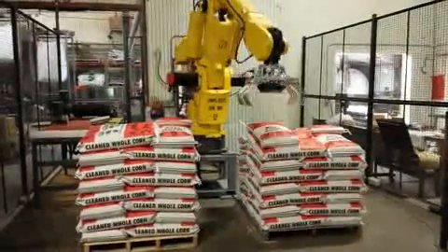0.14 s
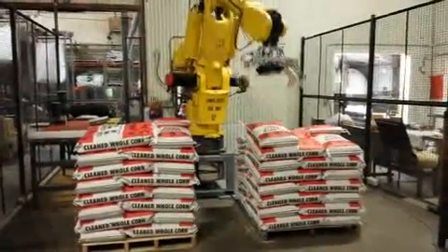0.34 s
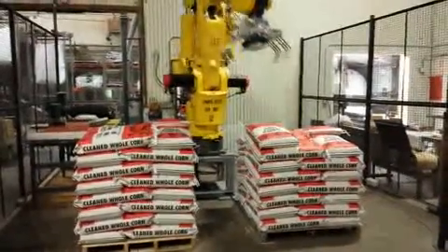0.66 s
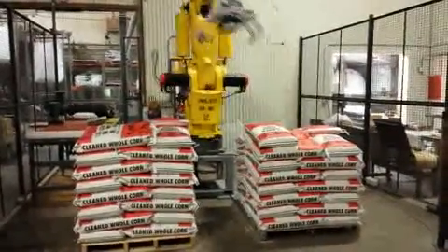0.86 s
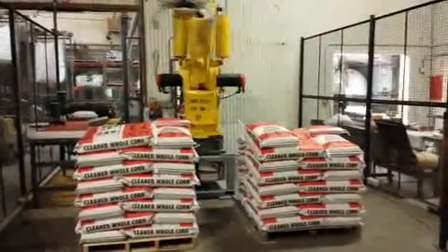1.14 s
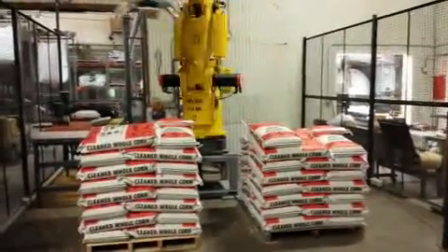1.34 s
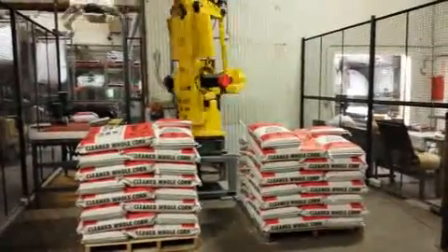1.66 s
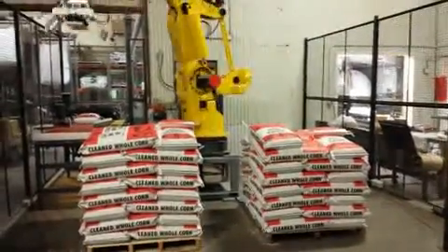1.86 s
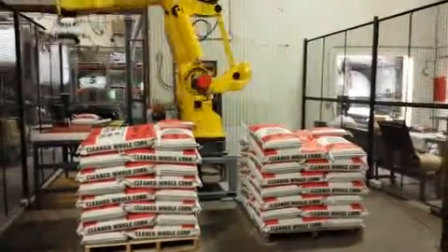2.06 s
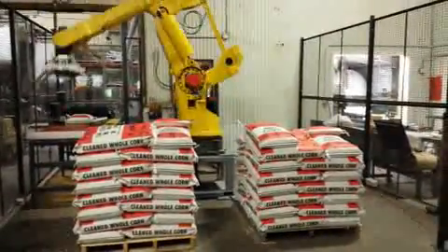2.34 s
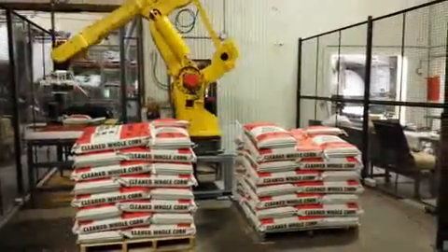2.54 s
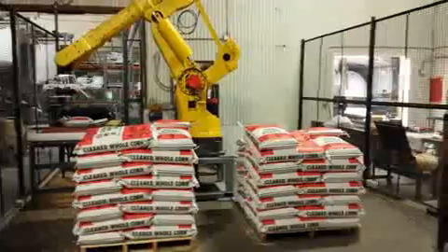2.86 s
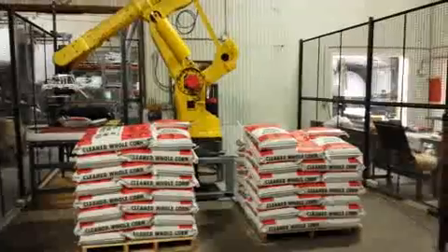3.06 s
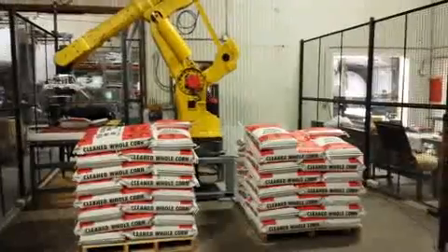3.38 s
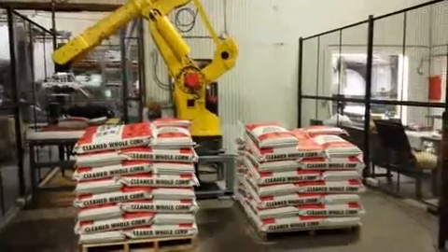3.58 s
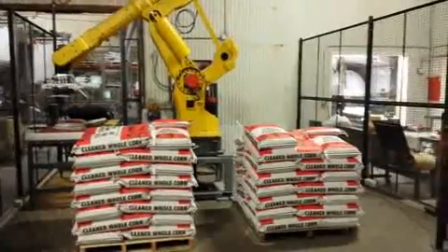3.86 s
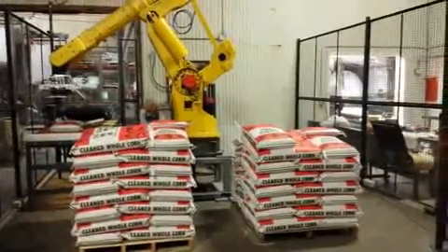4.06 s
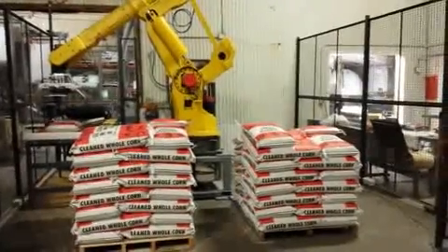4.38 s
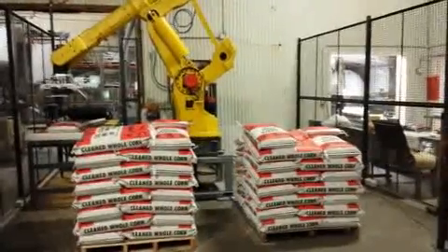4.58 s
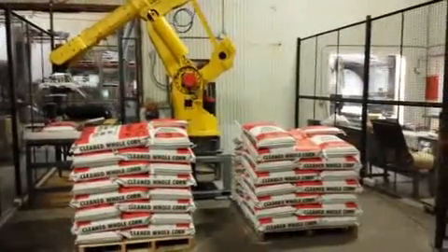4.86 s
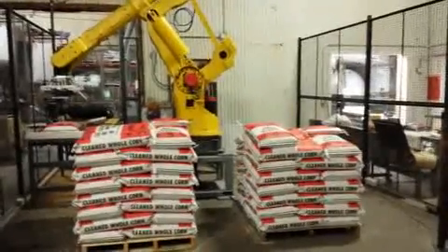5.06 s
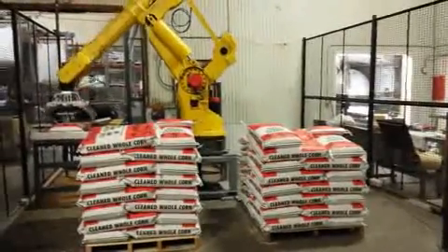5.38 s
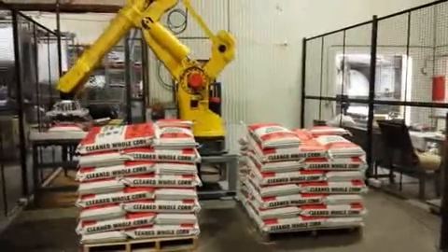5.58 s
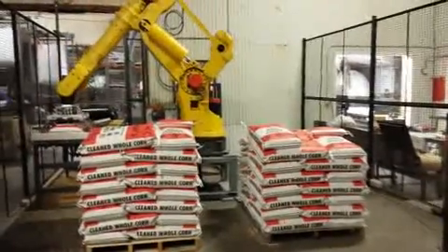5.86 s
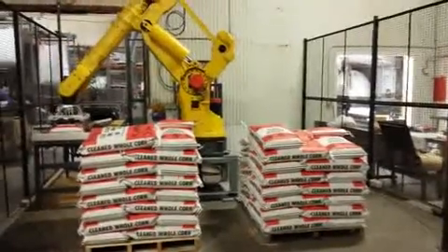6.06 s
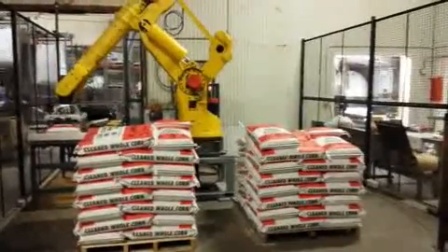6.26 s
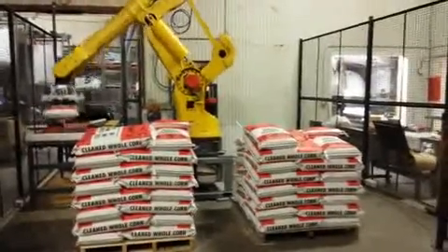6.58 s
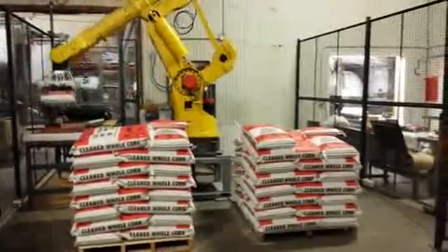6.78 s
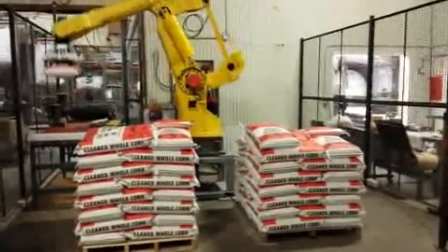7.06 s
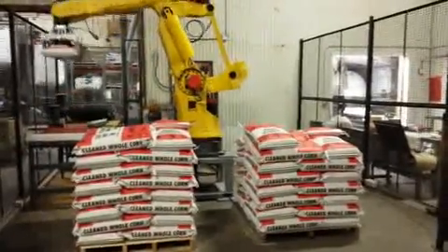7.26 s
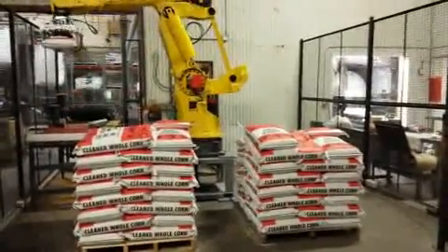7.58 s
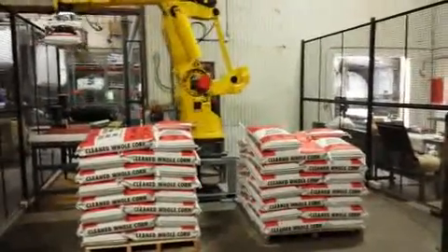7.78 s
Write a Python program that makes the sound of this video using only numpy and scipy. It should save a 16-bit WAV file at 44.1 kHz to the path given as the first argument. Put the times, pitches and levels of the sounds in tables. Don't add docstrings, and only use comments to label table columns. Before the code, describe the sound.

Heavy sacks thud down with air bursts, then a machine arm whines upward, metal clanks and sharp pneumatic hisses over whistling, humming factory noise.

```python
import sys
import numpy as np
from scipy import signal
from scipy.fft import rfft, irfft, next_fast_len
from scipy.io import wavfile
from scipy.ndimage import uniform_filter1d

SR = 44100
rng = np.random.default_rng(int(sys.argv[2]) if len(sys.argv) > 2 else 0)


def ratio(d):
    e = np.asarray(d, float) / 20
    return 10 ** e


def transcribe(signal):
    frames = np.atleast_2d(signal).T
    limited = np.clip(frames, -1, 1)
    pcm = np.round(limited * 32767).astype(np.int16)
    wavfile.write(sys.argv[1], SR, pcm)


N = 349266

# [pitch_hz, level_db per Hz]
BLOW_COLOUR = [(120, -44), (200, -4.5), (486, -5), (658, -10.5), (1030, -6), (2200, -3), (4910, -8),
               (5360, -3), (9140, -10), (14000, -30.5)]
# [start_s, level_db, ring_hz, fade_60db_s]
SACK_BLOWS = [
    (.016, -9.5, 2120, 0.077),
    (0.038, -16, 2050, .056),
    (.049, -25, 2100, .04),
    (.107, -28, 2140, .05),
    (.149, -10.5, 1880, 0.17),
    (.173, -9, 2080, .18),
]
# [start_s, level_db, ring_hz, fade_60db_s]
LATCH_BLOWS = [
    (4.934, -20, 1110, 0.27),
    (4.938, -27, 2000, .15),
    (4.957, -22, 1090, .2),
    (4.962, -19.5, 2040, .5),
    (5.002, -23, 1170, .12),
    (5.07, -29, 1100, 0.092),
]
# [start_s, level_db, ring_hz, fade_60db_s]
GRIPPER_BLOWS = [(4.17, -14, 1510, 0.83), (4.195, -14, 2090, .38), (4.23, -14, 2336, .16),
                 (5.002, -18, 1150, 0.21), (5.109, -14, 2010, 0.17), (5.7, -14.5, 1420, .15),
                 (6.06, -14, 2156, 0.22), (6.085, -15.5, 2170, 0.25), (6.11, -26, 1310, .15),
                 (6.811, -15.5, 2430, .25), (6.941, -14.5, 1464, 0.62), (7.82, -11.5, 1498, 0.36),
                 (7.86, -13.5, 2020, .25)]
# [left_minus_right_db, ring_share, rise_s]
STRUCK_THINGS = [
    (3, 0.43, 0.0017),
    (2.5, 2.2, .0011),
    (5.5, 0.32, .0012),
]


def clanks():
    mix = np.zeros((2, N))
    noise = diffuse(BLOW_COLOUR, patchy_db=1.0, flicker_db=.4)
    t = np.arange(SR // 3) / SR
    for blows, (lean_db, ring_share, rise_s) in zip((SACK_BLOWS, LATCH_BLOWS, GRIPPER_BLOWS), STRUCK_THINGS):
        for start_s, level_db, ring_hz, fade_s in blows:
            first = rng.integers(N - len(t))
            burst = noise[:, first:first + len(t)]
            ring = evened(resonate(burst, ring_hz, 94))
            attack = 1 - np.exp(-t / rise_s)
            shed_answer = ratio(-8.5 - 60 * t / 0.53)
            shape = attack * (ratio(-60 * t / fade_s) + shed_answer)
            level = ratio(level_db - 11.5) * sides(lean_db - 4.0)
            add(mix, start_s - .002, level * shape * (burst + ring_share * ring))
    return mix


# [time_s, pitch_hz, level_db]
SERVO_SWING = [
    (.7, 601, -68),
    (.97, 785, -50),
    (1.12, 850, -38),
    (1.3, 952, -32),
    (1.4, 980, -30.5),
    (1.47, 990, -25.5),
    (1.72, 997, -25),
    (1.84, 995, -29),
    (1.9, 997, -38),
]


def servo():
    t = np.arange(N) / SR
    start_s, end_s = SERVO_SWING[0][0], SERVO_SWING[-1][0]
    moving = np.interp(t, [start_s - .1, start_s, end_s, end_s + 0.17], [0, 1, 1, 0])
    pitch_hz = curve(SERVO_SWING, order=1)
    waver = evened(uniform_filter1d(rng.standard_normal(N), size=450))
    whine = np.sin(2 * np.pi * np.cumsum(pitch_hz * (1 + .011 * waver)) / SR)
    mesh = 1.2 * whine + .8 * ports(N, pitch_hz, 40)
    return ratio(curve(SERVO_SWING, order=2)) * moving * sides(-1.7) * mesh


# [start_s, level_db, open_s, fall_db_per_s]
VALVE_BLASTS = [(-.01, -27, 0.046, 125), (.01, -26.5, 0.0036, 450), (.1, -32, .002, 450),
                (.165, -32.5, .008, 600), (2.33, -33.5, 0.093, 100), (3.24, -34.5, .08, 100),
                (4.16, -36, .08, 80), (4.928, -25, 0.059, 167), (5.09, -34.5, 0.14, 200),
                (5.898, -19.5, 0.18, 168), (6.804, -27.5, .004, 150), (6.87, -33, 0.048, 97),
                (7.81, -46, 0.027, 40)]


def exhaust(t, bleed_db_per_s):
    opening_s, echo_db, echo_fall_db_per_s = 0.011, -16, 59
    power = 0
    for start_s, level_db, open_s, fall_db_per_s in VALVE_BLASTS:
        since = np.maximum(t - start_s, 0)
        shut = np.maximum(since - opening_s - open_s, 0)
        direct = ratio(-bleed_db_per_s * since - fall_db_per_s * shut)
        echo = ratio(echo_db - echo_fall_db_per_s * shut)
        opening = np.minimum(since / opening_s, 1)
        power = power + (ratio(level_db) * opening * (direct + echo)) ** 2
    return np.sqrt(power)


# [pitch_hz, level_db per Hz]
JET_COLOUR = [(900, -37), (1500, -15.5), (2160, -7.5), (3020, -10), (3870, -4.5), (6240, 1.5), (8000, -1),
              (9890, -4), (13000, -10.5), (14500, -21), (15200, -45)]


def valves():
    jet = diffuse(JET_COLOUR, patchy_db=1.2, flicker_db=.6)
    body = signal.filtfilt(*signal.butter(2, 7000, fs=SR), jet)
    treble = jet - body
    body_level = slowly(lambda t: exhaust(t, bleed_db_per_s=14))
    treble_level = ratio(2.5) * slowly(lambda t: exhaust(t, bleed_db_per_s=62))
    return ratio(4.0) * sides(-.8) * (body_level * body + treble_level * treble)


# [start_s, level_db, low_ring_hz, high_ring_hz]
RELAY_TICKS = [
    (2.2578, -9.5, 5900, 7900),
    (4.353, -26, 10700, 11000),
    (4.563, -21, 9500, 10500),
]


def ticks():
    mix, t = np.zeros((2, N)), np.arange(400) / SR
    for start_s, level_db, low_hz, high_hz in RELAY_TICKS:
        rings_hz = (low_hz, (low_hz + high_hz) / 2, high_hz)
        snap = sum(np.sin(2 * np.pi * hz * t) for hz in rings_hz)
        add(mix, start_s, ratio(level_db - 2 - 60 * t / .007) * snap * sides(.3))
    return mix


# [peak_s, level_db]
PRESSURE_SURGES = [(.04, 8), (.3, 8.5), (1.32, 5.5), (1.54, -4), (1.89, 1), (2.14, 3.5), (2.34, 2.5),
                   (2.65, 1.5), (2.82, 5.5), (3.15, -6), (3.37, 7), (3.6, 2.5), (3.88, 1), (4.08, 3),
                   (4.42, 6.5), (4.651, 1.5), (4.82, 4), (5.09, 2.5), (5.32, 1), (5.71, 4), (6.12, -5),
                   (6.34, 1), (6.55, -11), (6.83, 7.5), (7.0, 6.5), (7.14, 6), (7.36, 2), (7.6, 5),
                   (7.88, -7)]
# [deepest_s, change_db]
PRESSURE_DIPS = [(.19, -2), (1.18, 0.5), (2.245, -9), (2.6, -1.5), (3.25, -5), (3.99, -3), (5.25, -3),
                 (5.8, -2.5), (5.96, -7), (6.3, -4.5), (7.31, -3)]


def line_pressure(t):
    leak_db, kick_db_per_s, sink_db_per_s, dip_s = 2, 108, 64.5, 0.047
    power = ratio(leak_db) ** 2
    for peak_s, level_db in PRESSURE_SURGES:
        below_peak_db = np.maximum(kick_db_per_s * (peak_s - t), sink_db_per_s * (t - peak_s))
        power = power + ratio(level_db - below_peak_db) ** 2
    dips_db = sum(db * np.exp(-((t - s) / dip_s) ** 2) for s, db in PRESSURE_DIPS)
    return ratio(dips_db) * np.sqrt(power)


# [pitch_hz, width_hz, level_db, left_minus_right_db]
PIPE_NOTES = [(4745, 70, 0, 0), (4848, 50, .5, 2.5), (4990, 40, 1.5, -1), (5210, 34, -1, 2),
              (5515, 56, -7.5, 8), (5888, 50, -7, 6.5), (6352, 50, -5.5, 2)]


def whistle():
    leak = rng.standard_normal((2, N))
    leak[1] += 0.056 * leak[0]
    notes = 0
    for hz, width, level_db, lean_db in PIPE_NOTES:
        swell = evened(uniform_filter1d(rng.standard_normal(N), size=5000))
        note = evened(resonate(resonate(leak, hz, width), hz, 3 * width))
        notes = notes + ratio(level_db + 1.5 * swell) * sides(lean_db) * note
    return ratio(2.5) * slowly(line_pressure) * evened(notes)


# [multiple of shaft speed, level_db]
PUMP_HUM = [(2, 1.5), (3, -5), (4, -5), (5, 2), (6, -9.5), (7, -16.5), (9, -16)]
# [pitch_hz, level_db]
SHED_RESONANCE = [(40, -22), (62, -10), (77, 3), (90, -12), (104, -25), (130, -19), (155, 0.5), (240, 1.5)]


def pump():
    idle_hz, loaded_hz = 26.02, 19.8
    load_on_s, load_off_s, sag_s, recover_s = 2.61, 3.48, .45, .88
    t = np.arange(N) / SR
    load = 1 - np.exp(-np.clip(t - load_on_s, 0, load_off_s - load_on_s) / sag_s)
    recovery = np.exp(-np.maximum(t - load_off_s, 0) / recover_s)
    shaft_hz = idle_hz - (idle_hz - loaded_hz) * load * recovery
    turns = np.cumsum(shaft_hz) / SR
    hum = 0
    for multiple, level_db in PUMP_HUM:
        level = ratio(level_db + read(SHED_RESONANCE, multiple * shaft_hz))
        hum = hum + level * np.sin(2 * np.pi * (multiple * turns + rng.random()))
    return hum


# [pitch_hz, width_hz, level_db, left_minus_right_db, clean_share]
DRIVE_TONES = [(4000, 3.3, -18.5, -25, 0.65), (1470, 9, -16, 17, 0.4), (1980, 9, -10, -3, 0.71),
               (2560, 8, -8.5, 2, 0.6), (2100, 27, -3.5, 1, .1), (222, 12, 2.5, -3, 0.2),
               (240, 13, -5, 2, 0.11)]
# [start_s, end_s]
TONE_TIMES = [
    (2.55, 5.15),
    (5.33, 7.55),
    (5.33, 7.92),
    (1.1, 1.9),
    (1.4, 1.8),
    (7.58, 7.92),
    (0, 7.92),
]


def tones():
    mix = np.zeros((2, N))
    for (start_s, end_s), (hz, width, level_db, lean_db, clean) in zip(TONE_TIMES, DRIVE_TONES):
        size = round((end_s - start_s) * SR)
        t = np.arange(size) / SR
        pure = np.sqrt(2) * np.sin(2 * np.pi * hz * t)
        tone = (1 - clean) * ports(size, hz, width) + clean * pure
        switch = np.clip(np.minimum(t, t[::-1]) / 0.016, 0, 1)
        add(mix, start_s, ratio(level_db) * sides(lean_db) * tone * switch)
    return mix


def vent_db(t):
    open_times, shut_db, ramp_s = [(0, .4), (1.05, 5.24), (6.8, 7.92)], -2, 0.036  # (start_s, end_s)
    venting = sum(np.clip(np.minimum(t - a, b - t) / ramp_s + 1, 0, 1) for a, b in open_times)
    return shut_db * (1 - venting)


# [pitch_hz, level_db per Hz]
RUMBLE_COLOUR = [(20, -45), (40, -40), (64, -17), (110, -2), (173, -6), (237, -1.5), (395, -1.5),
                 (647, -20), (900, -15.5), (1170, -42), (1980, -120)]
# [pitch_hz, level_db per Hz]
CLATTER_COLOUR = [(290, -14.5), (500, -2), (635, -7), (829, -5), (1140, 1.5), (1650, -5), (2040, 1.5),
                  (2920, -8), (4300, -9.5), (4500, -5.5), (5850, -54), (9900, -120)]
# [pitch_hz, level_db per Hz]
AIR_COLOUR = [(2350, -19.5), (4000, -10), (4440, -10.5), (4840, -9.5), (5490, -8.5), (6510, -4.5),
              (7790, -11), (9600, -16), (11600, -20), (12500, -23), (13200, -18.5), (14000, -32),
              (15000, -35)]
# [time_s, effort_db]
WORK_EFFORT = [(0, -4), (.15, 4), (.35, 0.5), (.7, -4), (1.3, 3.5), (2.25, 4.5), (2.6, 1.3), (5.15, -0.9),
               (5.3, -2.5), (5.89, -0.5), (5.95, -6), (6.02, -6.5), (6.055, 0.6), (6.79, -1), (6.84, 4.5),
               (7.1, -1.9), (7.92, 1.2)]


def machinery():
    effort_db = curve(WORK_EFFORT, order=1)
    rumble = ratio(-0.5) * diffuse(RUMBLE_COLOUR, patchy_db=1.0, flicker_db=0.93)
    clatter = ratio(effort_db + 2.5) * diffuse(CLATTER_COLOUR, patchy_db=1.3, flicker_db=0.47)
    air_db = 0.083 * effort_db + 4 + slowly(vent_db)
    air = ratio(air_db) * diffuse(AIR_COLOUR, patchy_db=0.71, flicker_db=1.0)
    return rumble + clatter + air


# [pitch_hz, likeness from 0 to 1]
LIKENESS = [(60, 0.99), (120, 0.94), (240, 0.94), (470, 0.85), (930, 0.42), (1840, 0.026), (3650, 0.038),
            (7230, 0.03), (14300, 0.01)]


def diffuse(colour, patchy_db, flicker_db):
    frames, hz = N // 256 + 5, np.fft.rfftfreq(1024, 1 / SR)
    a, b, c, d, patches = rng.standard_normal((frames, 513, 5)).T
    patches = uniform_filter1d(patches, size=10, axis=0)
    patches = evened(uniform_filter1d(patches, size=14, axis=1))
    flicker = evened(uniform_filter1d(rng.standard_normal(frames), size=8))
    same = np.clip(read(LIKENESS, hz), -1, 1)[:, None]
    left = a + 1j * b
    right = same * left + np.sqrt(1 - same ** 2) * (c + 1j * d)
    level_db = read(colour, hz)[:, None] + patchy_db * patches + flicker_db * flicker
    z = np.array([left, right]) * ratio(level_db)
    return evened(signal.istft(z, nperseg=1024, noverlap=768)[1][:, :N])


def ports(size, hz, width):
    a, b = rng.standard_normal((2, size))
    same = np.clip(read(LIKENESS, np.mean(hz)), 0, 1)
    right = same * a + np.sqrt(1 - same ** 2) * b
    return evened(resonate(np.array([a, right]), hz, width))


def resonate(x, hz, width):
    turn = np.exp(2j * np.pi * np.cumsum(hz * np.ones(x.shape[-1])) / SR)
    r = np.exp(-np.pi * width / SR)
    return 2 * (turn * signal.lfilter([1 - r], [1, -r], x / turn)).real


def evened(x):
    return x / np.sqrt(np.mean(x ** 2) + 1e-20)


def read(points, hz):
    f, value = np.transpose(points)
    return np.interp(np.log(hz + 1), np.log(f + 1), value)


def curve(rows, order):
    return np.interp(np.arange(N) / SR, [r[0] for r in rows], [r[order] for r in rows])


def slowly(rule):
    t = np.arange(0, N / SR + .001, .001)
    return np.interp(np.arange(N) / SR, t, rule(t))


def sides(db):
    return ratio(np.array([[db / 2], [-db / 2]]))


def add(mix, start_s, sound):
    part = mix[:, round(start_s * SR):][:, :sound.shape[1]]
    part += sound[:, :part.shape[1]]


# [time_s,
# gain_db]
CAMERA_GAIN = [(0, -44), (.15, -42.5), (.35, -47.5), (.7, -47), (1, -39.5), (1.3, -31.5), (1.65, -27),
               (2.25, -30), (3.3, -30), (4.1, -30), (5.89, -29.5), (5.92, -37), (6.025, -36.5), (6.08, -32),
               (6.25, -35), (6.79, -37), (6.84, -31.5), (7.92, -28.5)]


def scene():
    near = clanks() + servo() + valves() + ticks()
    plant = whistle() + pump() + tones() + machinery()
    return plant + near / ratio(curve(CAMERA_GAIN, order=1))


# [pitch_hz, threshold_db]
LOST_BELOW = [(300, -70), (620, -43), (850, -43), (1300, -60), (7000, -60), (9000, -46), (10500, -42),
              (11200, -40), (11800, -40.5), (12550, -37.5), (12850, -45), (13400, -44), (13800, -41),
              (15000, -42)]


def masked(x):
    hz, t, z = signal.stft(x, SR, nperseg=1024, noverlap=768)
    power = uniform_filter1d(abs(z) ** 2, size=7, axis=2)
    total = uniform_filter1d(power[0].sum(0), size=9)
    wander_db = .9 * evened(uniform_filter1d(rng.standard_normal(len(t)), size=10))
    threshold_db = read(LOST_BELOW, hz)[:, None] + wander_db * (hz > 8000)[:, None]
    keep = power > total * ratio(2 * threshold_db)
    return signal.istft(z * keep, SR, nperseg=1024, noverlap=768)[1][:, :N]


def roll_off(x):
    return signal.sosfilt(signal.butter(12, 14930, fs=SR, output="sos"), x)


# [pitch_hz, left_minus_right_db]
MICROPHONE_LEAN = [(60, 0.5), (91, 2), (140, 1.5), (210, -0.5), (320, 0), (490, 4.5), (750, -0.5),
                   (1140, 1), (1740, 6), (2660, 0), (4050, 3), (6170, 6.5), (9400, -9.5), (14300, -9)]


def record(dry):
    size = next_fast_len(N)
    half_db = read(MICROPHONE_LEAN, np.fft.rfftfreq(size, 1 / SR)) / 2
    ridden = dry * ratio(curve(CAMERA_GAIN, order=1))
    heard = irfft(rfft(ridden, size) * ratio(np.array([half_db, -half_db])), size)[:, :N]
    return roll_off(masked(heard))


dry = scene()
out = record(dry)
transcribe(out)
```